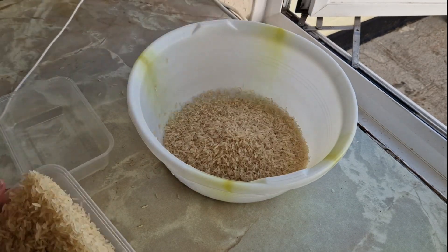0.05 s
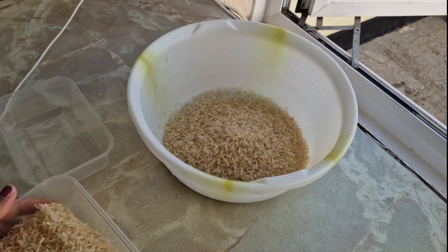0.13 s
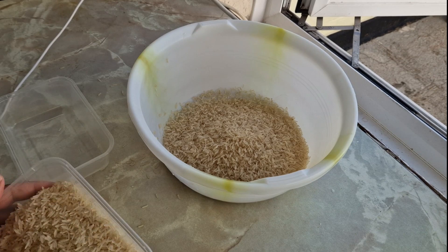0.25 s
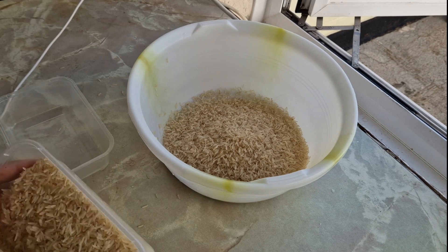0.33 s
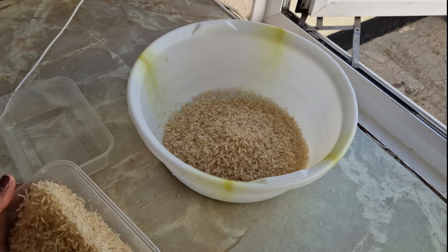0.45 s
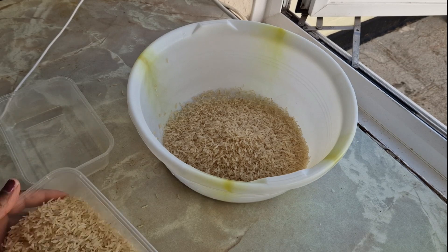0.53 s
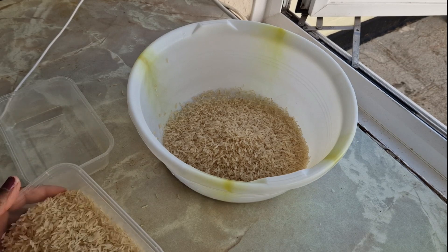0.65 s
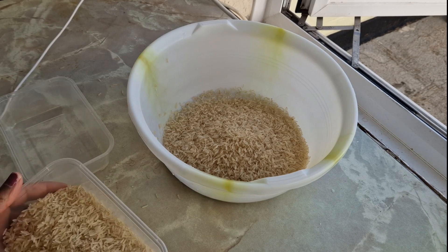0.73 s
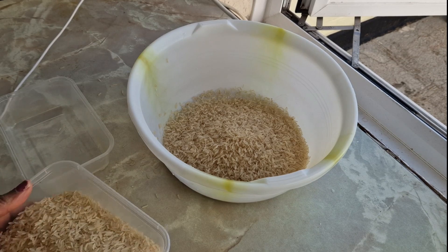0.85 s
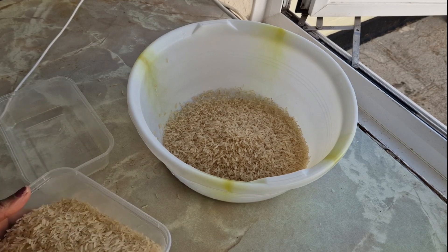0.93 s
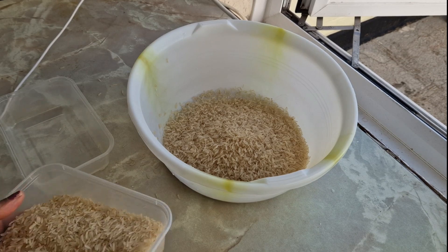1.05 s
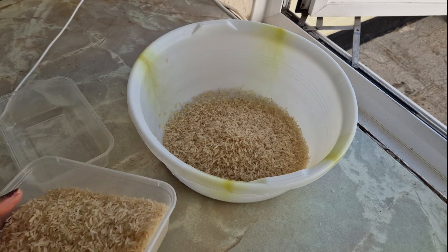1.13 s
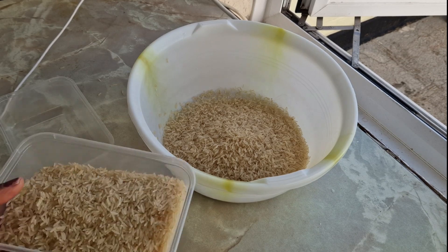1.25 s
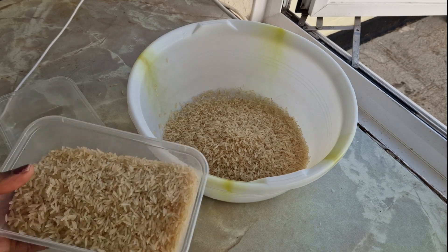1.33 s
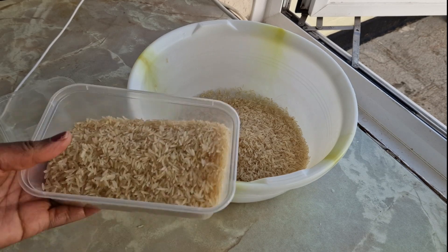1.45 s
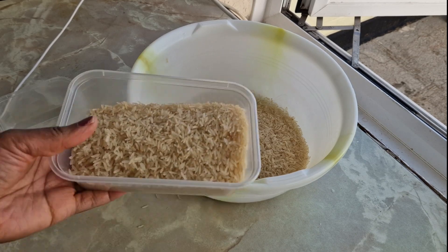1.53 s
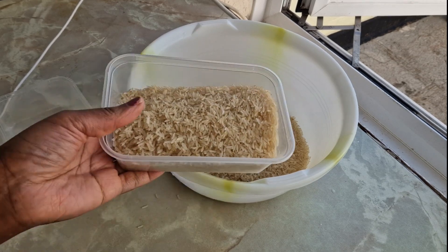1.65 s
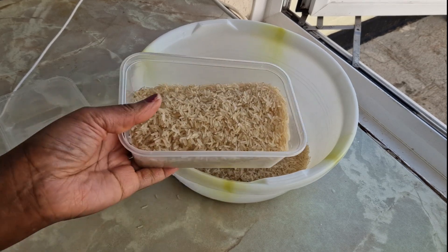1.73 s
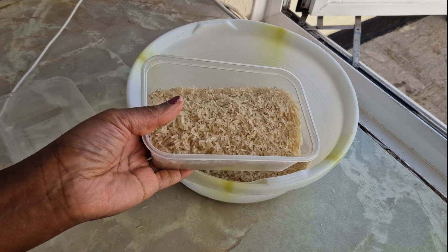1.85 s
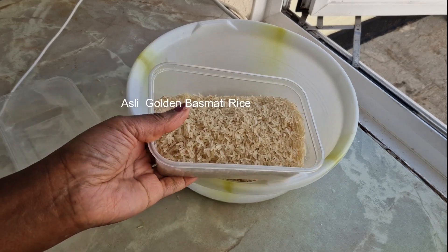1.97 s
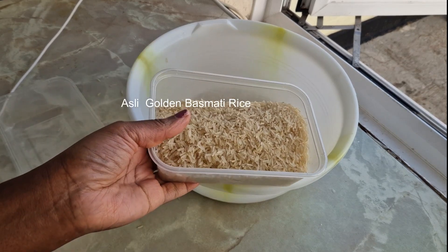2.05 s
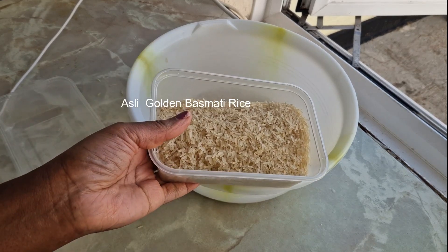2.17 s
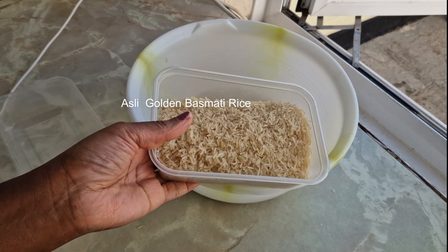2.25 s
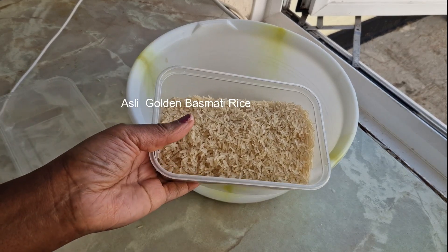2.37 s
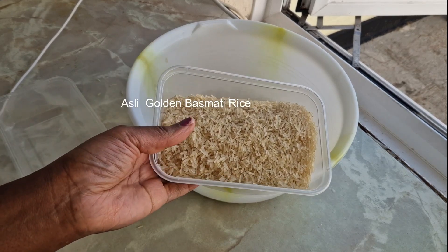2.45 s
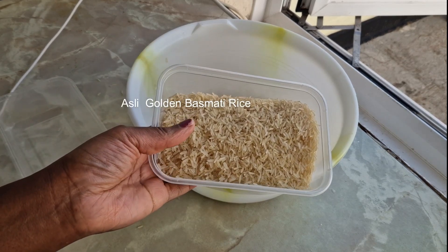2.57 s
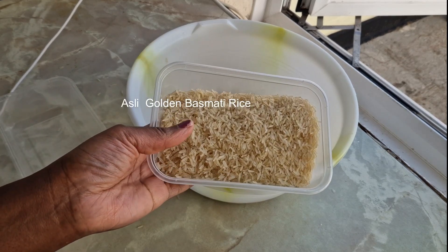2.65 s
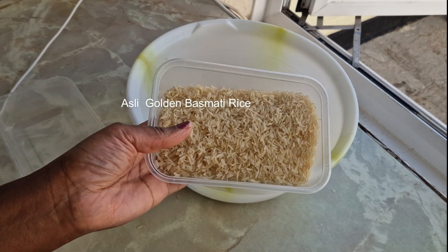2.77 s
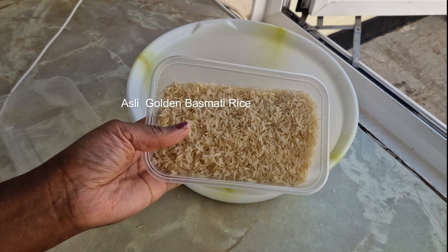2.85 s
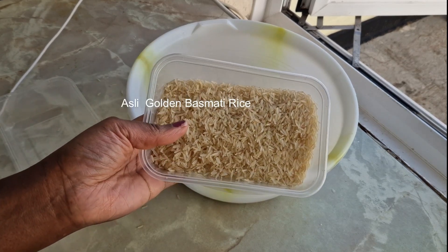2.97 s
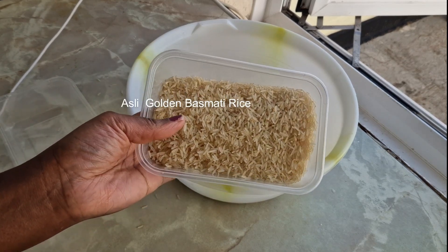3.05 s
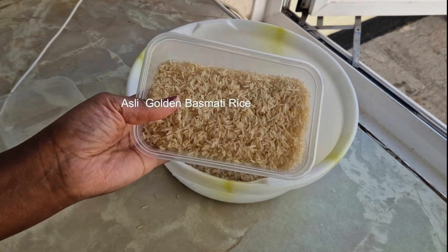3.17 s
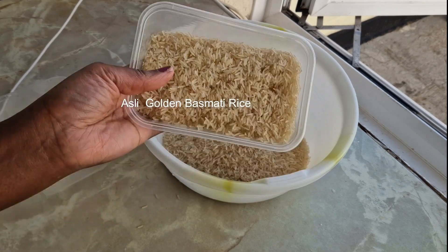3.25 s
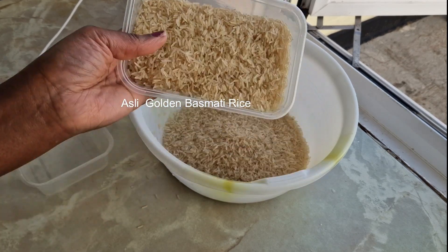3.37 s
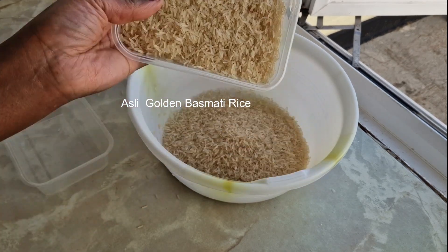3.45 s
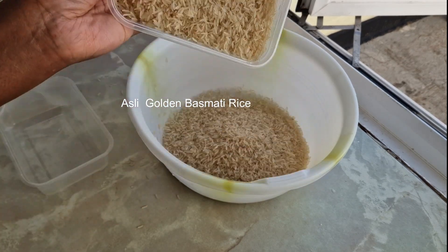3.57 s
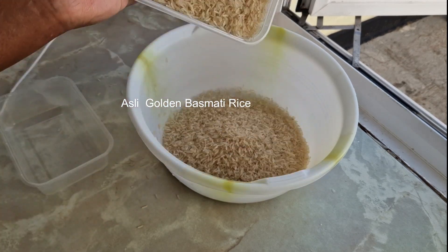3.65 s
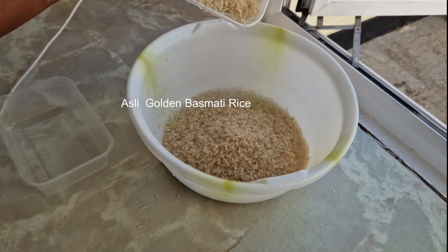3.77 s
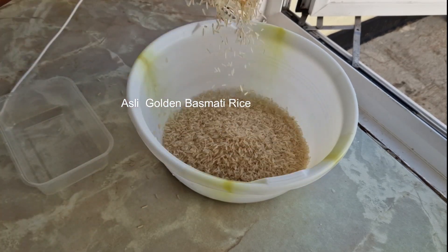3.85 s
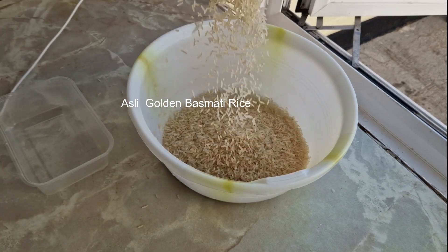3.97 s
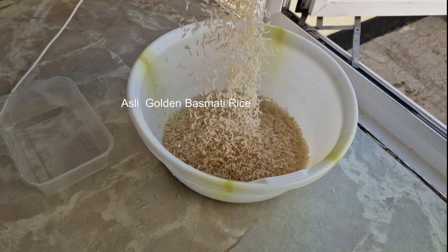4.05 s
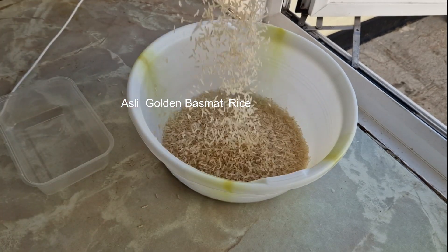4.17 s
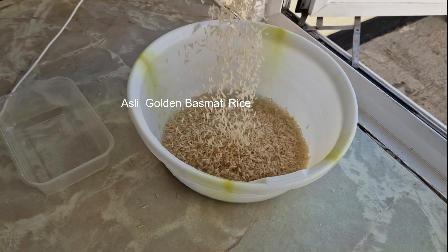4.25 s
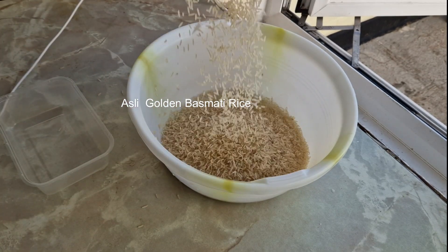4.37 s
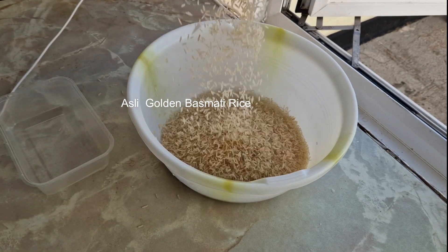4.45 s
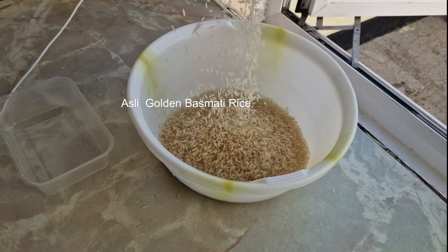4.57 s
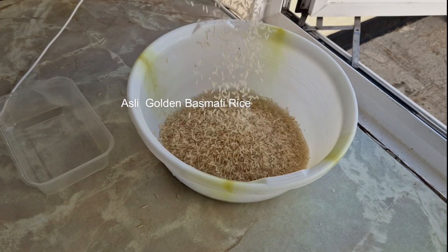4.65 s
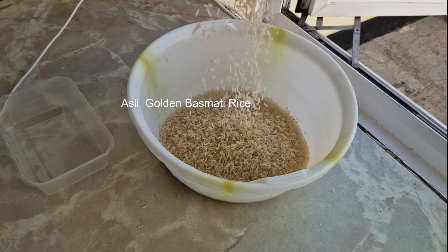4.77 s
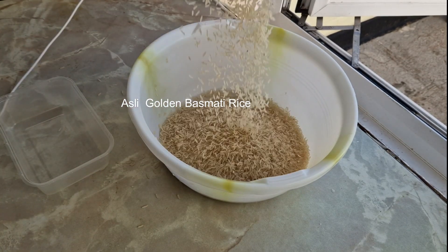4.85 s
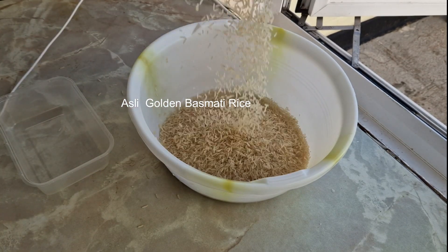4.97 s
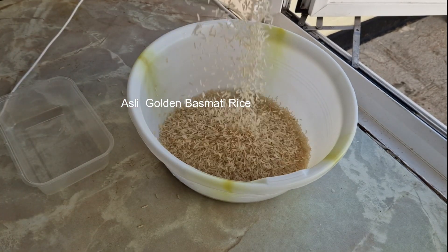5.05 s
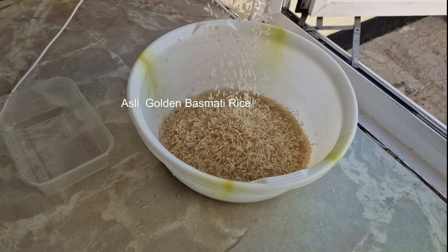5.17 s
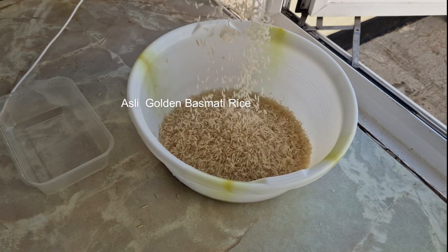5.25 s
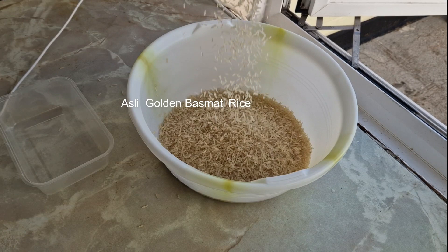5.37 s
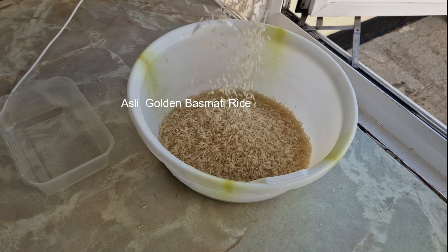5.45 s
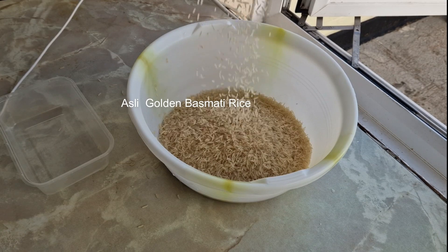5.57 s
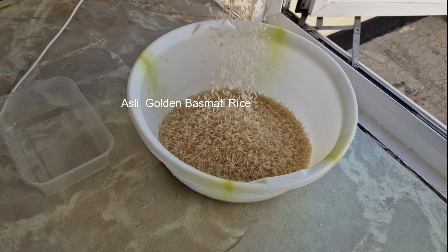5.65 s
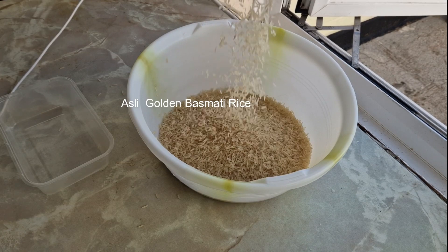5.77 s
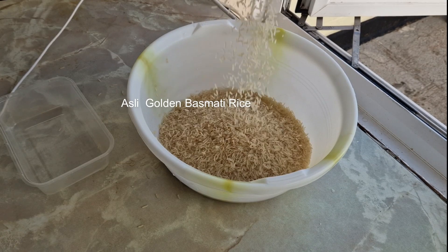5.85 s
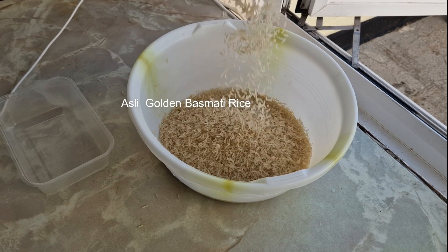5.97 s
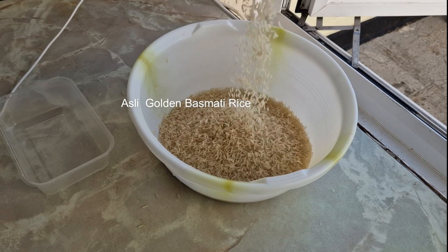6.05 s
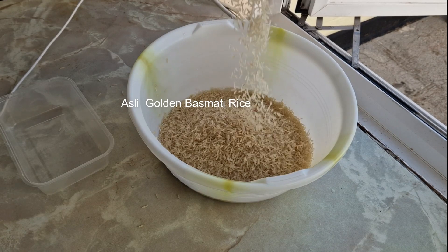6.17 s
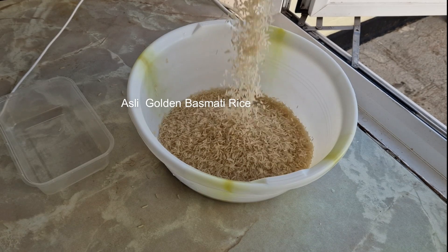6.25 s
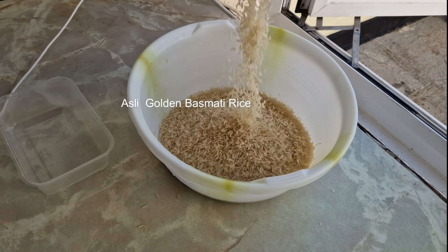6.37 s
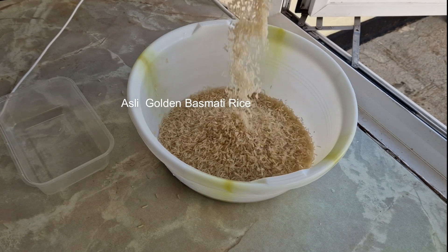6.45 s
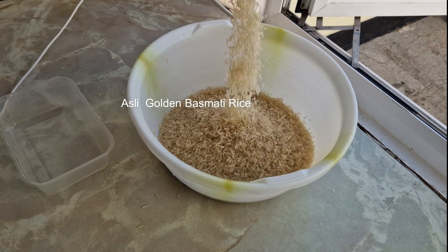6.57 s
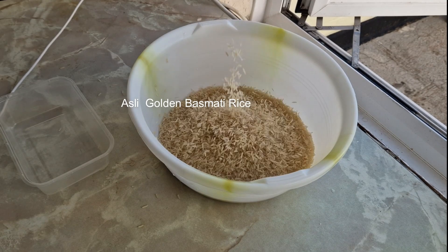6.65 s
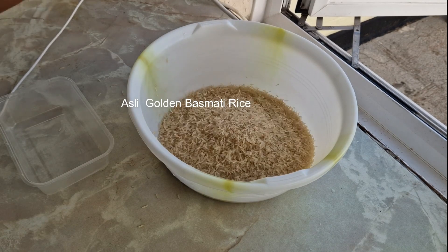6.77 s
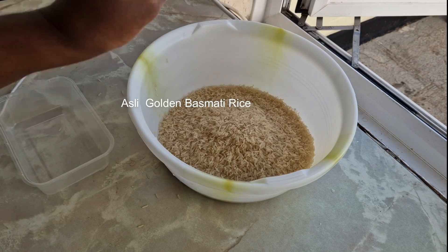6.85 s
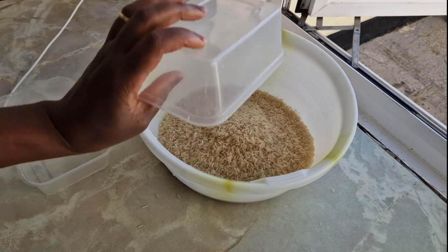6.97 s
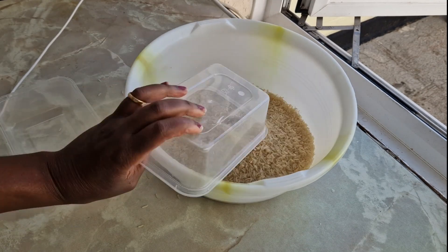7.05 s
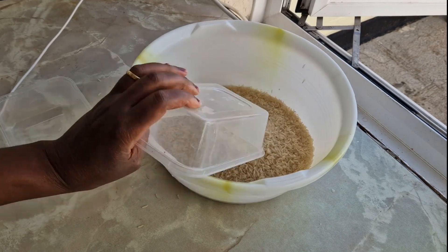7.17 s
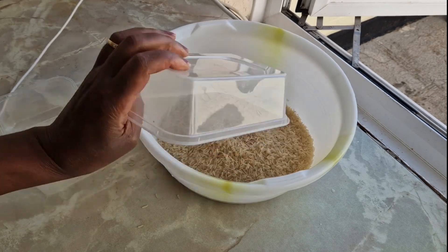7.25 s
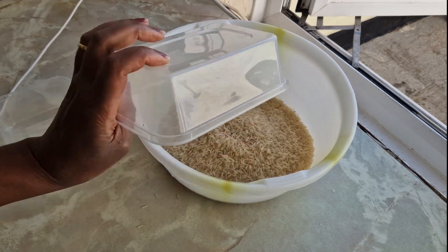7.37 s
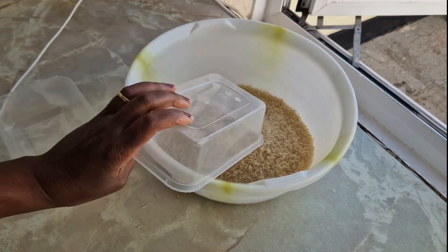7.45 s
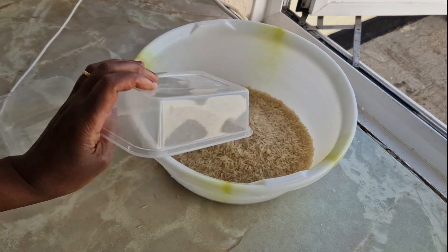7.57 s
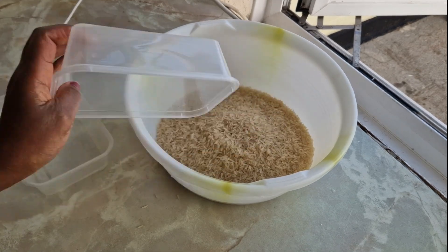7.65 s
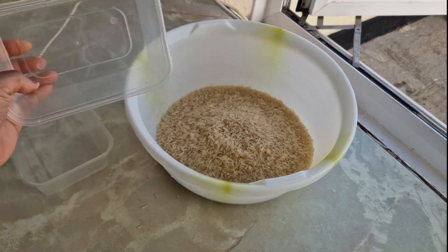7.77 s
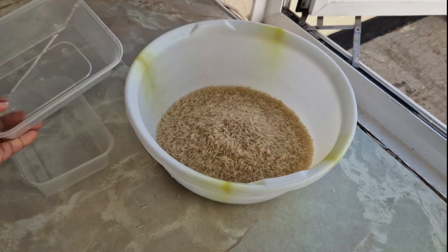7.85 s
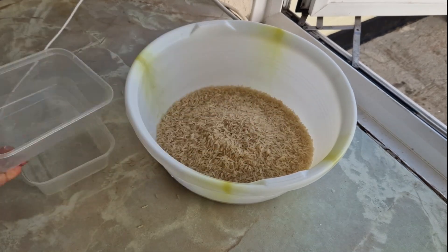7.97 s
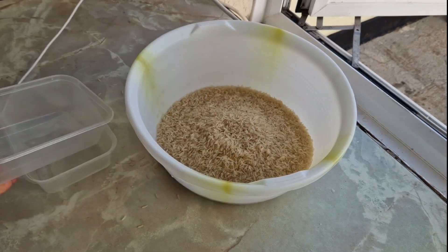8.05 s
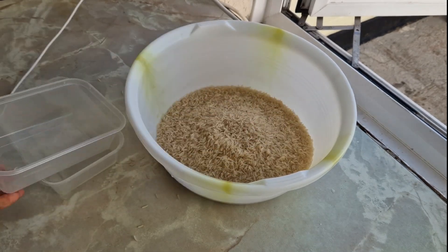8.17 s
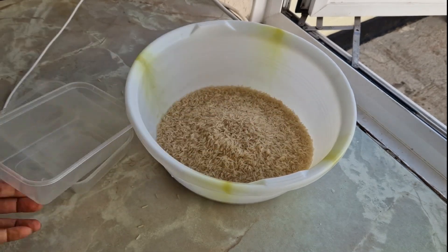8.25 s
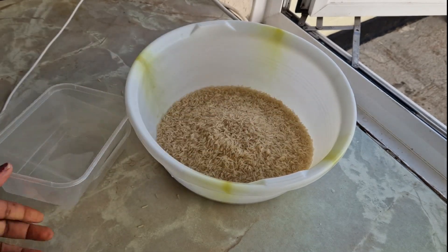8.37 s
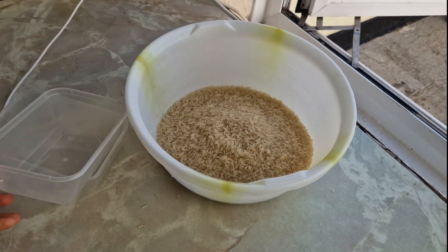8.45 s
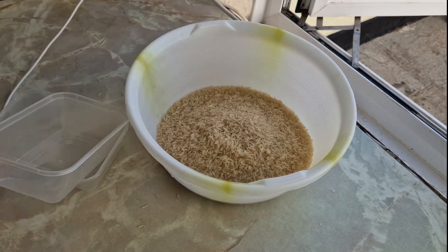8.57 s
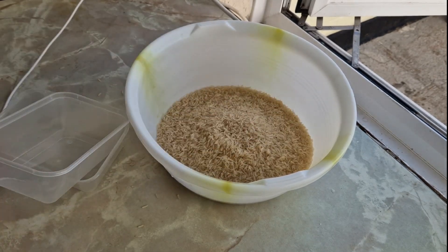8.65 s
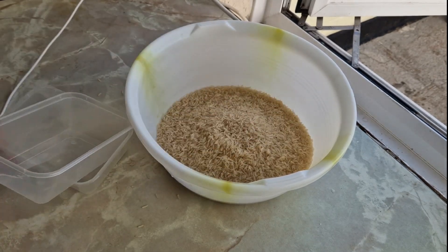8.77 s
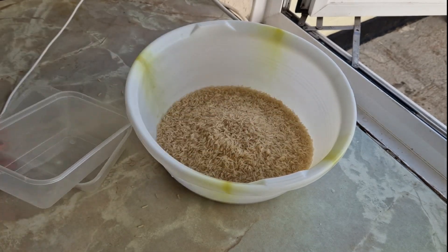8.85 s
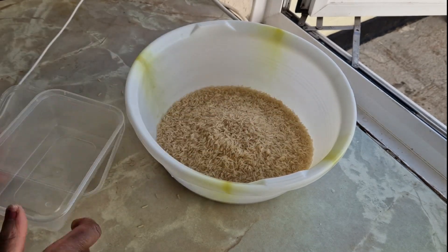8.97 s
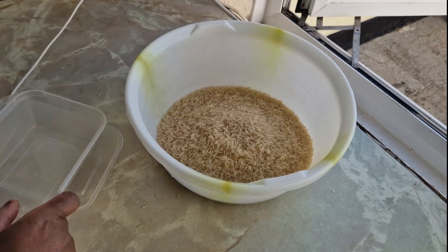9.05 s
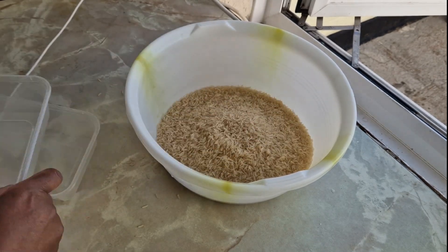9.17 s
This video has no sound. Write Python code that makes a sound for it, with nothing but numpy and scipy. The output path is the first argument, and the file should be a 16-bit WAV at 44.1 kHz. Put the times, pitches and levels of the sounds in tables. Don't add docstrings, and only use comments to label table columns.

```python
import sys
import numpy as np
from scipy import signal
from scipy.fft import rfft, irfft, next_fast_len
from scipy.io import wavfile
from scipy.ndimage import uniform_filter1d

SR = 44100
rng = np.random.default_rng(int(sys.argv[2]) if len(sys.argv) > 2 else 0)


def magnitude_from_level(level_db):
    exponent = np.asarray(level_db, float) / 20
    return 10 ** exponent


def output_pcm(signal):
    pcm = np.clip(np.atleast_2d(signal).T, -1, 1) * 32767
    wavfile.write(sys.argv[1], SR, np.round(pcm).astype(np.int16))


N = 406161


def rms_one(x):
    return x / np.sqrt(np.mean(x ** 2) + 1e-20)


def in_time(rows):
    s, *columns = np.transpose(rows)
    t = np.arange(N) / SR
    return [magnitude_from_level(np.interp(t, s, c, left=-140, right=-140)) for c in columns]


def at_hz(points, hz):
    table_hz, value = np.transpose(points)
    return np.interp(np.log(hz), np.log(table_hz), value)


def colour(x, points):
    cepstrum = irfft(np.log(magnitude_from_level(at_hz(points, np.linspace(1, SR / 2, 2049)))))
    cepstrum[1:2048] *= 2
    cepstrum[2049:] = 0
    response = irfft(np.exp(rfft(cepstrum)))
    return signal.oaconvolve(x, response[None], axes=1)[:, :x.shape[1]]


def drift(rate):
    r = np.exp(-40 * np.pi * rate / SR)
    noise = rng.standard_normal(N // 20 + 4002)
    slow = signal.lfilter([1], [1, -2 * r, r * r], noise)[4000:]
    return np.interp(np.arange(N) / 20, np.arange(len(slow)), rms_one(slow))


def ring(clicks, hz, t60):
    r, w = magnitude_from_level(-60 / (t60 * SR)), 2 * np.pi * hz / SR
    return signal.lfilter([0, np.sin(w)], [1, -2 * r * np.cos(w), r * r], clicks + 1e-18)


# f/Hz, correlation (-1 to 1)
LIKENESS = [(60, 0.97), (130, 1), (290, 0.87), (640, 0.55), (1410, -0.22), (3100, 0.13), (6820, -0.21),
            (15000, 0.14)]


def alike_noise(length):
    size = next_fast_len(length)
    mid, side = rfft(rng.standard_normal((2, size)))
    alike = np.clip(at_hz(LIKENESS, np.linspace(1, SR / 2, len(mid))), -1, 1)
    left_right = np.sqrt(1 + alike) * mid + np.sqrt(1 - alike) * side * [[1], [-1]]
    return irfft(left_right, size)[:, :length] / np.sqrt(2)


# f/Hz, level per Hz/dB
RUMBLE = [(16, -55), (28, -4.5), (44, -2.5), (140, -9.5), (270, -17.5), (480, -24), (900, -23.5),
          (1570, -28.5), (2300, -38.5), (3000, -37), (7000, -39), (11000, -39), (13000, -35), (14500, -42),
          (15800, -30.5)]
# t/s, level/dB
RUMBLE_LEVEL = [(0.0, -45), (0.5, -39), (2.2, -42.5), (3.6, -44), (6.5, -43), (8.0, -45), (9.21, -43)]
# f/Hz, width/Hz, level/dB
WHINE = [(295.5, 4.1, 12), (533, 19.5, 1.5), (1583, 68, -3), (3916, 260, -7.5), (4790, 150, -13.5),
         (5720, 380, -9), (7510, 52, -6), (9300, 400, -20.5), (12040, 180, -12), (11700, 40, -7),
         (12860, 98, -2.5), (13300, 97, -5), (13900, 220, -11), (15800, 250, -18.5)]


def background():
    size = next_fast_len(N + SR)
    f = np.maximum(np.arange(size // 2 + 1) * SR / size, 1)
    lines = sum(magnitude_from_level(db) / (1 + ((f - hz) / width) ** 2) for hz, width, db in WHINE)
    whine = rms_one(irfft(rfft(alike_noise(size)) * lines, size)[:, :N])
    floor = rms_one(colour(alike_noise(N), RUMBLE))
    low = signal.sosfilt(signal.butter(2, 220, fs=SR, output="sos"), floor)
    rumble = low * in_time(RUMBLE_LEVEL)[0] * magnitude_from_level(2.4 * drift(1) - 2.2)
    return rumble + magnitude_from_level(-45.5) * (floor - low) + magnitude_from_level(-54.5 + drift(1.2)) * whine


def envelope(full_s, swell_s, hold_s, level_db, sag_db_per_s, fall_db_per_s):
    swell_db = 30
    t = np.arange(0, N, 16) / SR - full_s
    sag = sag_db_per_s * np.minimum(t, hold_s)
    fall = fall_db_per_s * np.maximum(t - hold_s, 0)
    lost = np.where(t < 0, -t * swell_db / swell_s, sag + fall)
    return np.repeat(magnitude_from_level(level_db - np.minimum(lost, 120)), 16)[:N]


def movements(rows, sag_db_per_s, fall_db_per_s, vessel_late_s):
    hiss, vessel = np.zeros((2, N))
    for s, swell, hold, db, below_db in rows:
        hiss += envelope(s, swell, hold, db, sag_db_per_s, fall_db_per_s)
        vessel_hold = max(hold - 2.2 * vessel_late_s, 0)
        vessel += envelope(s + vessel_late_s, swell + 2 * vessel_late_s, vessel_hold, db + below_db,
                           sag_db_per_s, fall_db_per_s)
    return np.stack([hiss, vessel])


def grains(per_s, uneven_db, clumps):
    n = len(clumps)
    sizes = magnitude_from_level(uneven_db * np.minimum(rng.exponential(1, n), 4)) * rng.choice([-1, 1], n)
    clicks = sizes * (rng.random(n) < per_s / SR) * clumps
    late = np.clip(np.arange(n) + rng.integers(-9, 10, n), 0, n - 1)
    return rms_one(np.stack([clicks, np.bincount(late, clicks, n)]))


def rice(gains, span, hiss, vessel, per_s, uneven_db, surge_db, clump_db, blur):
    clumps = magnitude_from_level(surge_db * drift(26.6) + clump_db * drift(120))[span]
    far = blur * alike_noise(len(clumps))
    on_grain = grains(per_s, uneven_db, clumps) + far
    on_vessel = grains(per_s * .3, uneven_db, clumps) + far
    hiss_gain, vessel_gain = gains[:, span]
    out = np.zeros((2, N))
    out[:, span] = rms_one(colour(on_grain, hiss)) * hiss_gain
    out[:, span] += rms_one(colour(on_vessel, vessel)) * vessel_gain
    return out


# full at t/s, swell/s, hold/s, hiss level/dB, patter re hiss/dB
SHAKES = [
    (0.01, 0.033, 0.46, -43.5, -11),
    (0.097, 0.038, .015, -30, -12.5),
    (0.122, 0.03, 0.064, -12.5, -10.5),
    (0.455, 0.15, 0.018, -33.5, -12.5),
    (0.479, 0.01, .006, -18, -20),
    (0.483, 0.044, 0.074, -15.5, -10),
    (0.165, 0.0205, .004, -25, -14),
    (0.565, 0.024, 0.015, -31.5, -11),
]
# f/Hz, level per Hz/dB
SHAKE_HISS = [(1290, -46), (2200, -5), (2700, -17), (2940, -4.5), (3190, -3), (4700, 0), (7460, -2),
              (7970, -3.5), (9020, -1.5), (13100, -0.5), (15800, 0.5)]
# f/Hz, level per Hz/dB
SHAKE_TUB = [(180, -52), (300, -15.5), (328, -33), (376, -20), (602, -15.5), (677, -12), (863, -10),
             (1040, -2.5), (2600, -10), (3380, -56), (5720, -120)]


def shaking():
    gains = movements(SHAKES, sag_db_per_s=33, fall_db_per_s=238, vessel_late_s=0.019)
    return rice(gains, slice(0, SR), SHAKE_HISS, SHAKE_TUB,
                per_s=7000, uneven_db=2.5, surge_db=3.0, clump_db=0.0, blur=0.88)


def burst(t60):
    t = np.arange(1500) / SR
    return alike_noise(1500) * magnitude_from_level(-60 * t / t60) / 2


def ticks(rows, edge_hz):
    bright, dull = np.zeros((2, 2, N + 1500))
    for s, peak_db, low_db in rows:
        i = round(s * SR)
        bright[:, i:i + 1500] += magnitude_from_level(peak_db - 3.5) * burst(0.023)
        dull[:, i:i + 1500] += magnitude_from_level(peak_db + low_db + 8.5) * burst(0.025)
    bright = colour(bright, [(edge_hz * .6, -30), (edge_hz, 2.5), (8000, 2.0), (12000, 5.0), (16000, 4.0)])
    dull = colour(dull, [(600, -5.0), (1200, 6.5), (2600, 7.0), (5000, -31)])
    return (bright + dull)[:, :N]


# full at t/s, swell/s, hold/s, hiss level/dB, patter re hiss/dB
SETTLING = [
    (0.72, .2, .78, -50, -22),
]
# f/Hz, level per Hz/dB
SETTLE_HISS = [(2940, -18), (5000, -13.5), (7750, -3.5), (13000, -6), (15800, -12)]
# t/s, peak level/dB, low part re peak/dB
SETTLE_TICKS = [(0.7575, -24, -17), (0.939, -29, -30), (0.968, -31, -15), (1.015, -26, -29),
                (1.064, -33, -9), (1.15, -29, -20), (1.227, -27, -28), (1.335, -34, -27), (0.778, -26, -19),
                (0.883, -40, -13), (1.238, -30, -23), (1.3015, -33, -23), (1.3997, -39, -25),
                (1.4182, -35, -23), (1.45, -35, -27), (0.35, -34, -15), (0.36, -26, -14)]


def settling():
    gains = movements(SETTLING, sag_db_per_s=9, fall_db_per_s=100, vessel_late_s=.001)
    rolling = rice(gains, slice(SR // 2, 2 * SR), SETTLE_HISS, SHAKE_TUB,
                   per_s=500, uneven_db=3.0, surge_db=1.5, clump_db=2.5, blur=0.7)
    return rolling + ticks(SETTLE_TICKS, edge_hz=6500)


def blows(rows, modes, ring_db, longest_t60, crack_t60, thud_db):
    delay_s = .002
    s, peak_db, crack_db, pan_db = np.transpose(rows)
    start = round(s[0] * SR) - 10
    at = np.round((s + delay_s) * SR).astype(int) - start
    spread = rng.normal(0, 1.5, (len(at), len(modes)))
    body, crack, thud = np.zeros((3, 2, at[-1] + SR // 4))
    for k, (hz, level_db, t60) in enumerate(modes):
        clicks = np.zeros(body.shape[1])
        sign = -(-1) ** k
        clicks[at] = sign * magnitude_from_level(peak_db + level_db + ring_db + spread[:, k])
        lean = magnitude_from_level(np.mean(pan_db) / 2 + rng.normal(0, 0.5))
        body += ring(clicks, hz, min(t60, longest_t60)) * [[lean], [1 / lean]]
    for i, bright_db, dull_db, pan in zip(at, crack_db, peak_db, pan_db):
        crack[:, i:i + 1500] += magnitude_from_level(bright_db + 8.5) * burst(crack_t60)
        thud[:, i:i + 1500] += magnitude_from_level(dull_db + thud_db + [[pan / 2], [-pan / 2]]) * burst(0.071)
    body += colour(thud, [(100, -31.0), (300, 3.5), (900, 0.3), (2500, -11.0), (5000, -51.0)])
    body += colour(crack, [(800, -7.0), (2500, 2.0), (8000, -2.2), (16000, -3.5)])
    return np.pad(body, ((0, 0), (start, N)))[:, :N]


# t/s, peak level/dB, crack level/dB, left-right/dB
TAP = [
    (2.019, -20, -61, 2),
]
# f/Hz, level/dB, T60/s
FULL_TUB = [(483, 5, 0.081), (985, -5, 0.074), (1264, 0, 0.043), (1600, -8, 0.078), (1750, -12, 0.027),
            (1930, -19, 0.015), (2100, -12, 0.08), (2310, -24, 0.059), (2550, -36, 0.11)]


def tap():
    return blows(TAP, FULL_TUB, ring_db=-13, longest_t60=0.037, crack_t60=.015, thud_db=4.0)


# full at t/s, swell/s, hold/s, hiss level/dB, patter re hiss/dB
SLIDES = [
    (3.128, .03, 0.044, -48, -16.5),
    (3.225, 0.01, 0.17, -36, -12.5),
    (3.55, 0.061, .02, -49, -15),
    (3.7, 0.2, .13, -38, -19.5),
    (3.96, 0.28, 0.094, -47, -12.5),
]
# full at t/s, swell/s, hold/s, hiss level/dB, patter re hiss/dB
LEFTOVERS = [
    (7.105, 0.011, 0.055, -29, -5),
    (7.236, .01, 0.0034, -47, -27),
    (7.525, .01, 0.023, -34, -1.5),
    (8.04, 0.011, 0.0077, -35, 1),
    (8.16, .01, 0.23, -52, -5.5),
    (8.898, 0.0022, .01, -65.5, 7),
    (9.11, 0.51, 0.029, -51, 1.5),
]
# f/Hz, level per Hz/dB
SLIDE_HISS = [(1290, -20), (2200, -2.5), (3350, -0.5), (4510, 0.5), (5270, 2), (6590, -2), (8100, -2.5),
              (12400, 0), (15800, -1.5)]
# f/Hz, level per Hz/dB
SLIDE_TUB = [(350, -52), (600, -4), (666, -8.5), (856, -11), (1110, 0), (2030, -12), (2600, -10),
             (3380, -53), (5720, -120)]
# t/s, peak level/dB, low part re peak/dB
TICKS = [(3.112, -28, -23), (3.1279, -24, -15.5), (3.19, -29, -32), (3.219, -22.5, -33),
         (3.543, -30, -18.5), (3.3627, -30, -6), (3.6292, -27, -14.5), (7.1427, -21, -2),
         (7.1757, -16, -21), (7.235, -26, -10), (7.247, -23, -11), (7.2877, -29, -18), (7.3494, -31, -14),
         (7.5444, -39, 9), (7.9418, -27.5, -39), (8.11, -33, -5.5), (9.056, -50, -7)]


def sliding():
    gains = movements(SLIDES, sag_db_per_s=11, fall_db_per_s=183, vessel_late_s=0.029)
    gains += movements(LEFTOVERS, sag_db_per_s=41, fall_db_per_s=179.0, vessel_late_s=0.0038)
    slip = rice(gains, slice(3 * SR, N), SLIDE_HISS, SLIDE_TUB,
                per_s=4000, uneven_db=3.5, surge_db=2.3, clump_db=1.5, blur=0.6)
    return slip + ticks(TICKS, edge_hz=3000)


# t/s, level/dB
FLOW = [(4.09, -54), (4.21, -34), (4.87, -38.5), (5.04, -34), (5.36, -37.5), (5.7, -40), (6.27, -32),
        (6.84, -35.5), (6.992, -60.5)]


def strays():
    per_s, over_flow_db, spread_db, mean_low_db = 40, 6, 1.0, -13
    s, flow_db = np.transpose(FLOW)
    when, size, low = rng.random((round(per_s * (s[-1] - s[0])), 3)).T
    when = s[0] + when * (s[-1] - s[0])
    peak_db = np.interp(when, s, flow_db) + over_flow_db - spread_db * np.log(size + .05)
    return list(zip(when, peak_db, mean_low_db + 16 * (low - .5)))


# full at t/s, swell/s, hold/s, hiss level/dB, patter re hiss/dB
SPURTS = [
    (4.068, .01, .005, -46, -13),
    (4.118, 0.016, 0.0047, -35, -9),
    (4.15, 0.0071, 0.23, -50, -2),
    (5.09, 0.072, 0.017, -32, -27),
    (5.17, 0.049, 0.018, -35, -8.5),
    (5.27, 0.11, 0.008, -37, -23),
    (6.465, 0.031, 0.093, -35, -7.5),
    (6.745, 0.12, 0.0049, -34, -4.5),
]
# f/Hz, level per Hz/dB
POUR_HISS = [(1290, -19.5), (2200, -21.5), (2330, -12.5), (2620, -2), (4780, -4), (7460, -2), (8230, -2.5),
             (10800, -2), (12100, 0.5), (15200, -3), (15800, -5)]
# f/Hz, level per Hz/dB
POUR_BOWL = [(240, -46), (400, -14), (551, -4.5), (630, -19), (772, -11), (855, -12.5), (1110, -12.5),
             (1340, 3), (1870, -2.5), (2330, 3), (2600, -3.5), (3380, -39), (5720, -120)]
# t/s, peak level/dB, low part re peak/dB
BOWL_TICKS = [(4.0657, -22.5, -9.5), (4.1083, -25, -11), (4.12, -21, -14), (4.148, -23, -16),
              (4.1804, -24, -18), (4.2118, -22.5, -12), (4.229, -20, -8), (4.2555, -16, -17),
              (4.3014, -23, -13), (4.3316, -22, -15), (4.366, -31, -19), (4.3854, -26, -16),
              (4.404, -24, -6), (4.4304, -24, -18), (4.473, -31, -16), (4.5396, -24, -11),
              (4.5774, -19, -17), (4.6229, -16.5, -13), (4.6602, -16.5, -14), (4.695, -17.5, -18),
              (4.901, -28, -18), (4.947, -25, -20), (4.9711, -20, -16), (4.998, -22, -19),
              (5.0746, -12.5, -16), (5.0914, -22.5, -22), (5.1537, -21, -16), (5.1745, -26, -12),
              (5.2633, -22, -18), (5.3344, -34, -16), (5.3766, -21.5, -15), (5.4482, -27, -13),
              (5.4577, -20, -24), (5.627, -17, -17.5), (5.683, -29, -14), (5.7189, -29, -21),
              (5.7475, -28.5, -11), (5.8257, -30, -16), (5.9182, -26, -21), (6.0167, -22, -11.5),
              (6.0666, -18, -11), (6.1762, -20, -9), (6.2643, -15, -14.5), (6.325, -32, -16),
              (6.3924, -30, -16), (6.4609, -21, -14), (6.6273, -27, -23), (6.6633, -18, -16),
              (6.6853, -18, -17)]


def pouring():
    gains = in_time(FLOW)[0] * magnitude_from_level([[0], [-10]])
    gains = gains + movements(SPURTS, sag_db_per_s=32, fall_db_per_s=249, vessel_late_s=0.0013)
    stream = rice(gains, slice(4 * SR, 7 * SR + 100), POUR_HISS, POUR_BOWL,
                  per_s=5000, uneven_db=3.0, surge_db=1.06, clump_db=1.5, blur=0.6)
    return stream + ticks(BOWL_TICKS, edge_hz=3000) + ticks(strays(), edge_hz=3000)


# t/s, peak level/dB, crack level/dB, left-right/dB
FIRST_KNOCK = [
    (7.0695, -25, -32, 3),
    (7.0745, -2, -16, 4),
    (7.0805, -9.5, -17.5, -3),
    (7.087, -8.5, -40, -2),
    (7.118, -17.5, -45, 15),
    (7.14, -18, -30.5, 7),
]
# f/Hz, level/dB, T60/s
HELD_TUB = [(191, -22, 0.16), (290, -11, .05), (470, -6, .09), (551, -9.5, 0.16), (656.5, -6.5, .13),
            (936, -14, 0.11), (1120, -14, .08), (1268, -10, 0.081), (1490, -10, 0.05), (1520, -20, 0.077),
            (1966, -23, .05), (2334, -11, 0.044), (2425, -7.5, 0.032), (2700, -18, 0.043)]
# t/s, peak level/dB, crack level/dB, left-right/dB
SECOND_KNOCK = [
    (7.4715, -22.5, -38, 8),
    (7.4955, -2.5, -18.5, -9),
    (7.499, -9, -41, -5),
    (7.529, -19.5, -48, 14),
    (7.543, -23, -46, 10),
]
# f/Hz, level/dB, T60/s
UPTURNED_TUB = [(202, -13, .11), (300, -3.5, .045), (370, -18, 0.051), (468, -17, .08), (554, -10.5, .1),
                (658, -13, 0.072), (944, -8, .09), (1070, -15, 0.046), (1246, -11, .08), (1345, -7, 0.052),
                (1580, -7, .045), (1850, -14, .05), (2380, -9, .04), (2820, -29, .04)]


def knocks():
    first = blows(FIRST_KNOCK, HELD_TUB, ring_db=-7.5, longest_t60=0.18, crack_t60=0.069, thud_db=8.5)
    second = blows(SECOND_KNOCK, UPTURNED_TUB, ring_db=-6, longest_t60=0.08, crack_t60=0.089, thud_db=7.0)
    return first + second


# t/s, peak level/dB, f/Hz, T60/s
PUNCHES = [
    (7.0768, 0.5, 396, 0.013),
    (7.0773, -8, 290, 0.028),
    (7.4969, -10, 510, 0.012),
    (7.5008, -0.5, 402, 0.011),
    (7.5014, -15, 302, 0.034),
]


def punches():
    push = np.zeros(N)
    for s, db, hz, t60 in PUNCHES:
        click = np.arange(N) == round(s * SR)
        push += ring(-magnitude_from_level(db) * click, hz, t60)
    return signal.sosfilt(signal.butter(2, 170, "high", fs=SR, output="sos"), push)


def wobble():
    band = signal.butter(2, [45, 90], "band", fs=SR, output="sos")
    flap = rms_one(signal.sosfilt(band, rng.standard_normal(N)))
    return flap * envelope(full_s=7.15, swell_s=0.055, hold_s=0.053, level_db=-33.5,
                           sag_db_per_s=10.5, fall_db_per_s=460)


# t/s, peak level/dB, crack level/dB, left-right/dB
SET_DOWN = [(8.016, -18.5, -22, 2), (8.038, -28, -49, -1), (8.07, -37, -50, 2), (8.087, -32, -34, -6),
            (8.146, -29.5, -35, 9), (8.157, -34, -48, 2), (8.248, -36, -46, 2), (8.265, -36, -45, 7),
            (8.894, -39.5, -43.5, 8), (9.09, -35.5, -42.5, 7), (9.113, -29.5, -40, 0)]
# f/Hz, level/dB, T60/s
LOOSE_TUB = [(136, -6.5, 0.1), (403, -9, 0.1), (525, -3, 0.082), (841, -1, 0.1), (1110, 5.5, 0.032),
             (1340, 3, 0.027), (1780, -9, 0.82), (285, -18, 0.05), (187, -8.5, 0.1), (2860, -40, 0.18),
             (3390, -9.5, 0.13)]


def set_down():
    return blows(SET_DOWN, LOOSE_TUB, ring_db=-11.5, longest_t60=0.11, crack_t60=0.063, thud_db=12.5)


# f/Hz, T60/s
ROOM_T60 = [(100, 0.47), (250, 0.31), (500, 0.31), (2000, 0.3), (8000, 0.19), (16000, 0.039)]


def kitchen(x):
    t, noise, tail = np.arange(SR // 2) / SR, alike_noise(SR // 2), 0
    for hz in 90 * 2. ** np.arange(8):
        octave = signal.butter(2, [hz / np.sqrt(2), hz * np.sqrt(2)], "band", fs=SR, output="sos")
        decay = magnitude_from_level(-60 * t / at_hz(ROOM_T60, hz)) * np.clip(t / 0.0017, 0, 1)
        tail = tail + signal.sosfilt(octave, noise) * decay
    tail /= np.sqrt(np.sum(tail ** 2) / 2)
    return signal.fftconvolve(x.mean(axis=0)[None], tail, axes=1)[:, :N]


def scene():
    loose = shaking() + settling() + sliding() + pouring()
    struck = tap() + knocks() + punches() + set_down()
    tail = kitchen(magnitude_from_level(-10.5) * loose + magnitude_from_level(-8.5) * struck)
    return background() + loose * magnitude_from_level([[.3], [-.3]]) + struck + wobble() + tail


# f/Hz, share of bands dropped (0 to 1)
STARVED = [(1800, 0), (2600, .15), (3600, .17), (4600, .27), (5600, .22), (6800, .24), (7600, .12),
           (8300, .06), (11000, .04), (12000, .005), (15000, .01)]


def starved_bands(x):
    mid_side = np.stack([x[0] + x[1], x[0] - x[1]]) / 2
    spec = signal.stft(mid_side, nperseg=1024, noverlap=512)[2]
    bands = spec[:, :512].reshape(2, 64, 8, -1)
    level = 10 * np.log10(np.mean(abs(bands) ** 2, axis=2) + 1e-20)
    prominence = level - uniform_filter1d(level, size=25, axis=1)
    worth = .5 * prominence + 9 * rng.standard_normal(level.shape)
    worth = uniform_filter1d(worth, size=4, axis=2)
    shared = uniform_filter1d(16 * rng.standard_normal(level.shape[1:]), size=5, axis=0)
    worth += uniform_filter1d(shared, size=4, axis=1)
    worth += uniform_filter1d(3 * rng.standard_normal(level.shape[2]), size=5)
    loud = level.mean(axis=1)
    worth += 2 * np.maximum(loud - uniform_filter1d(loud, size=7), 0)[:, None]
    share = at_hz(STARVED, (np.arange(64) + .5) * SR / 128)
    rank = np.argsort(np.argsort(worth, axis=2), axis=2) / worth.shape[2]
    kept = rank >= share[:, None]
    spec[:, :512] = (bands * kept[:, :, None]).reshape(2, 512, -1)
    mid, side = signal.istft(spec, nperseg=1024, noverlap=512)[1][:, :N]
    return np.stack([mid + side, mid - side])


def top_cut(x):
    return signal.sosfilt(signal.butter(12, 16700, fs=SR, output="sos"), x)


def record(dry):
    rounded = .95 * np.tanh(dry / .95)
    low_pass = signal.ellip(12, .3, 48, 15720, fs=SR, output="sos")
    mix = starved_bands(signal.sosfilt(low_pass, rounded))
    return top_cut(mix)


dry = scene()
out = record(dry)
output_pcm(out)
```